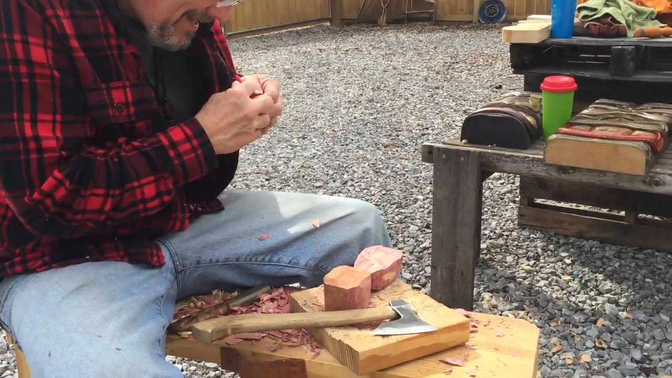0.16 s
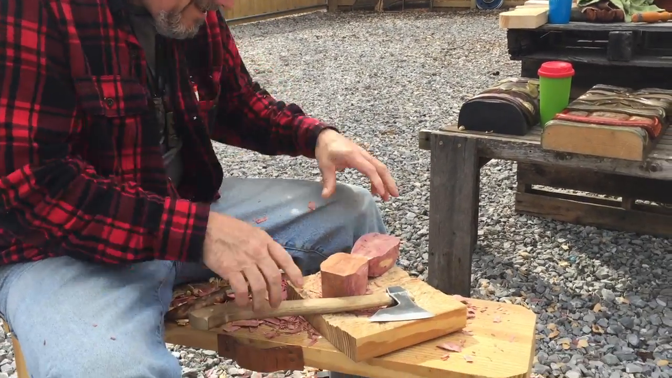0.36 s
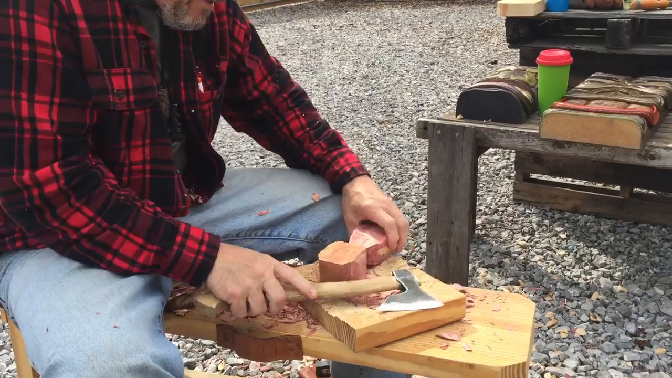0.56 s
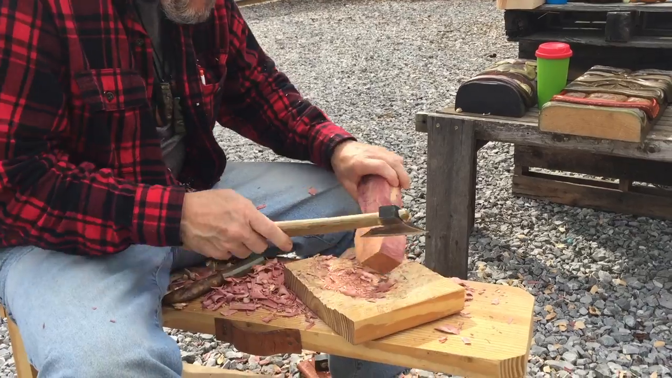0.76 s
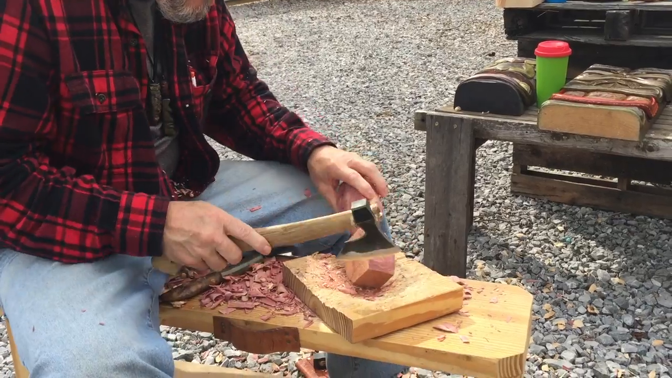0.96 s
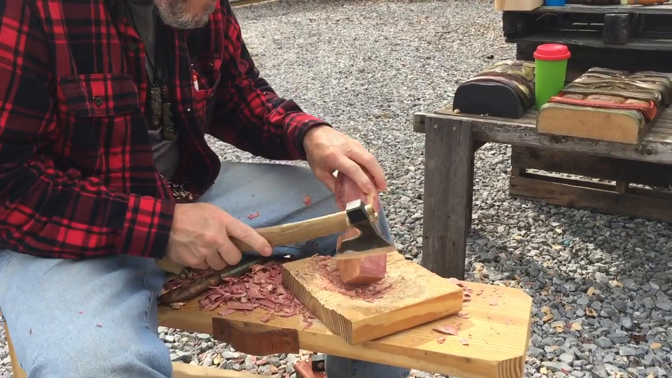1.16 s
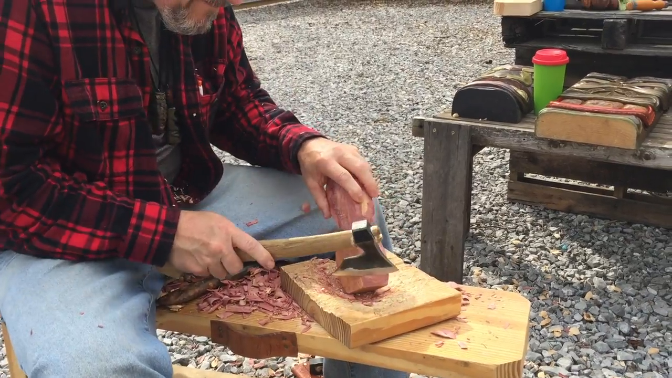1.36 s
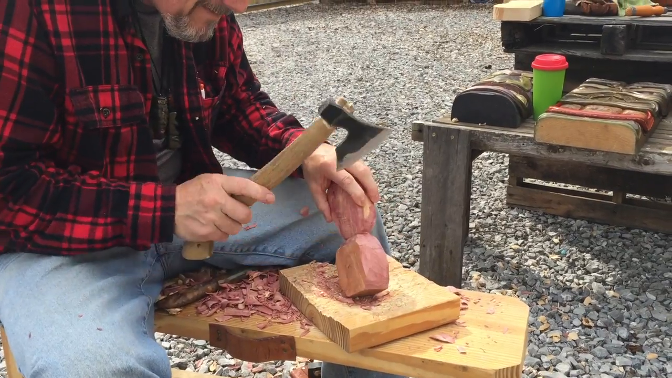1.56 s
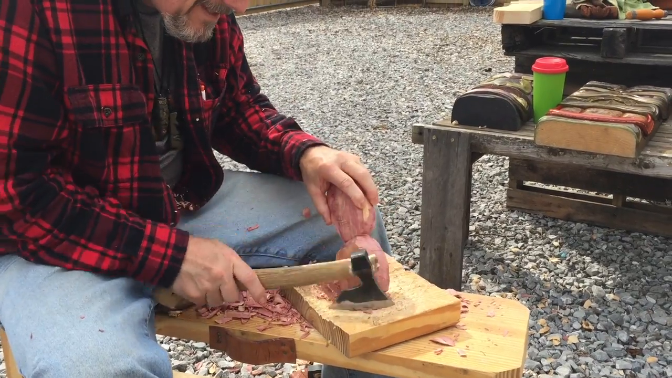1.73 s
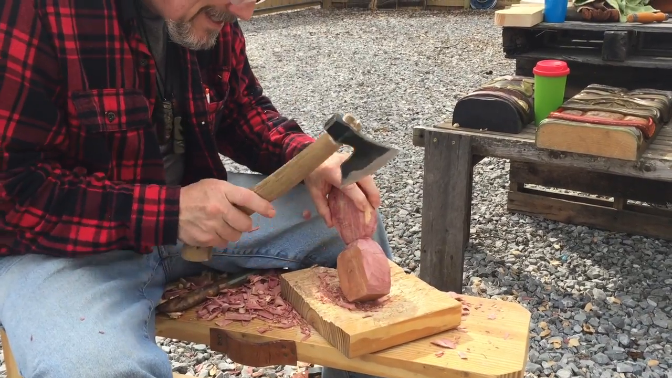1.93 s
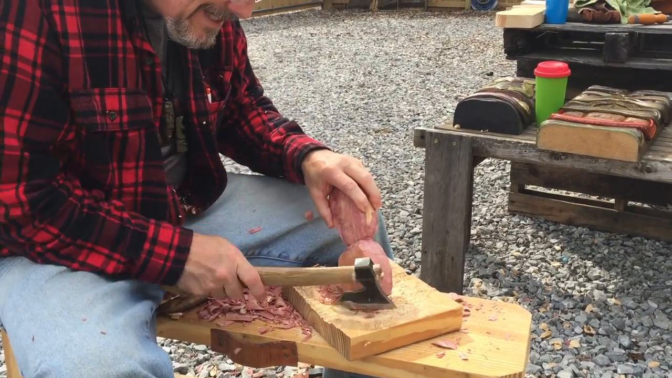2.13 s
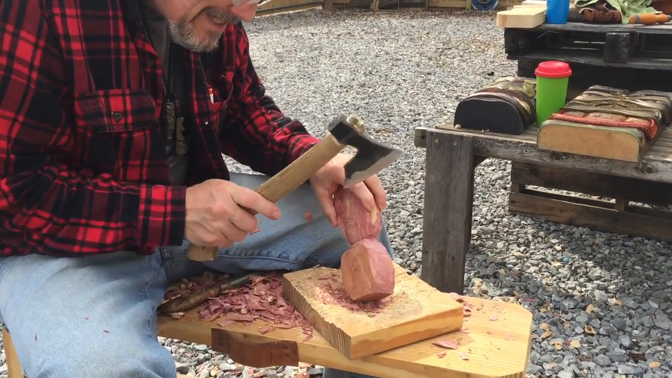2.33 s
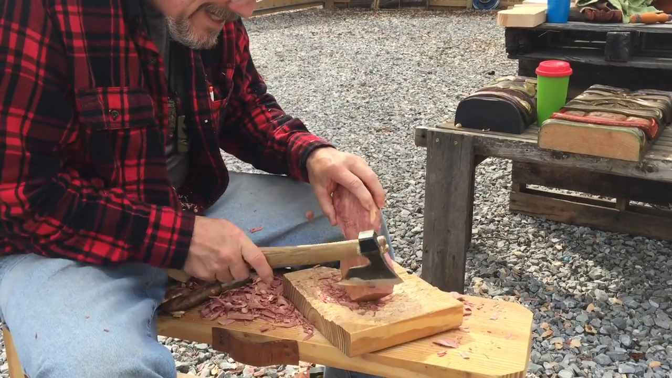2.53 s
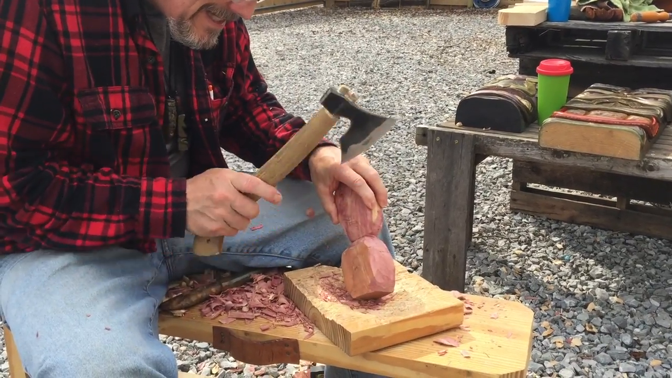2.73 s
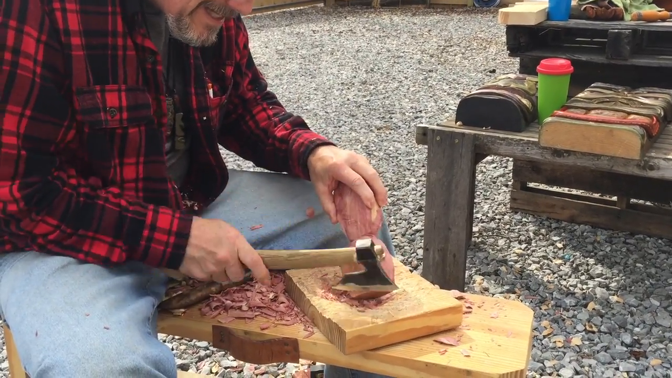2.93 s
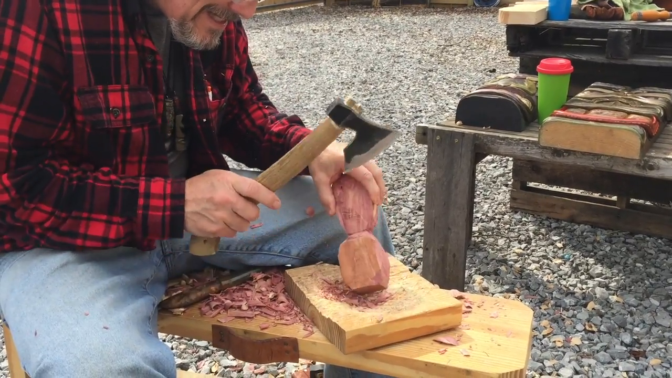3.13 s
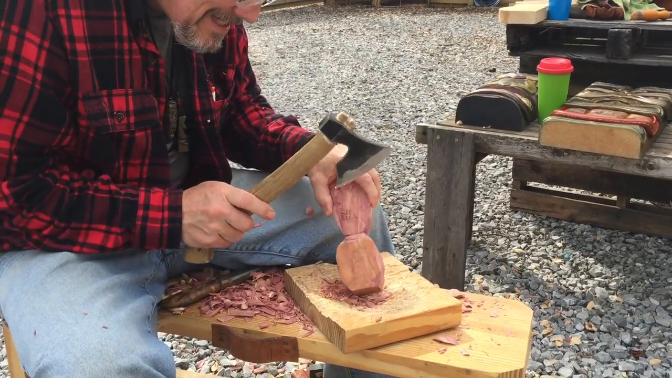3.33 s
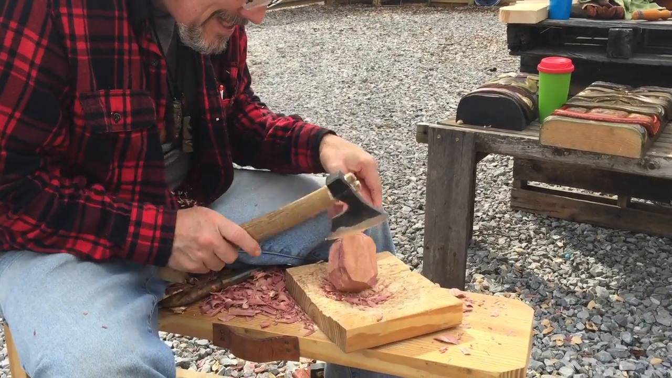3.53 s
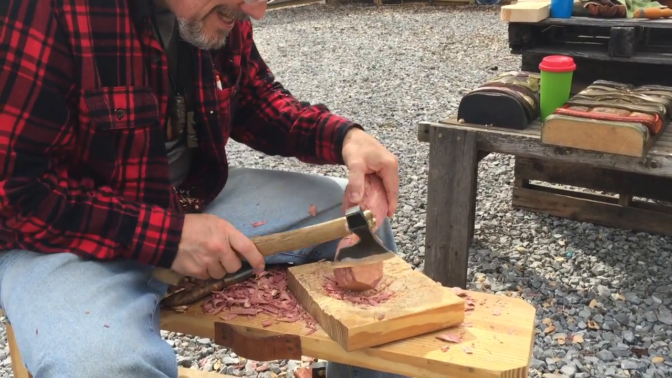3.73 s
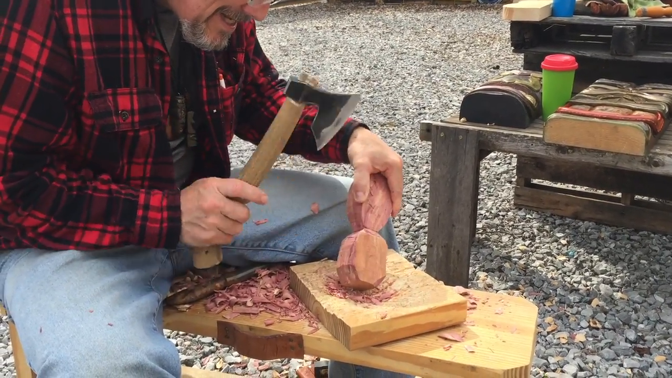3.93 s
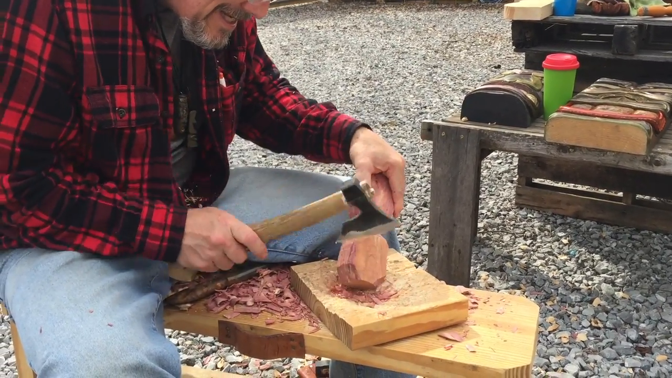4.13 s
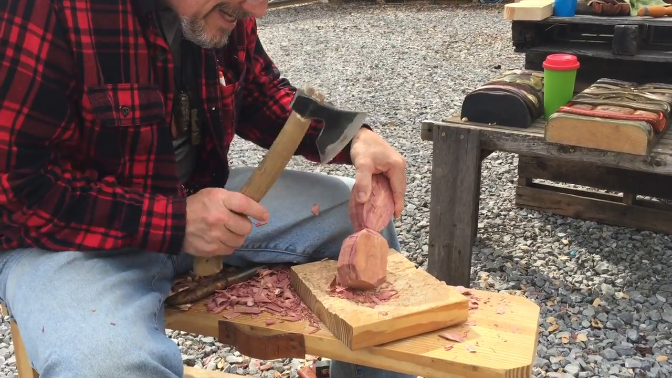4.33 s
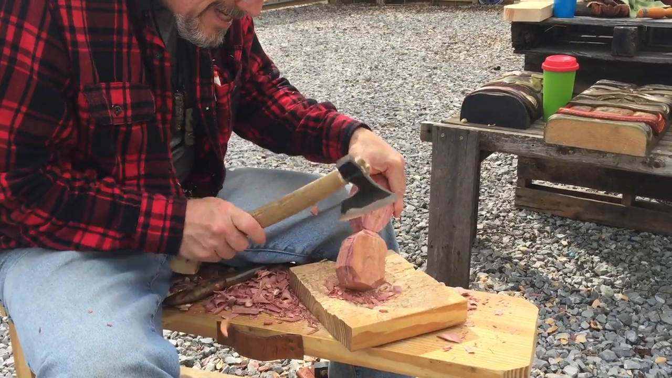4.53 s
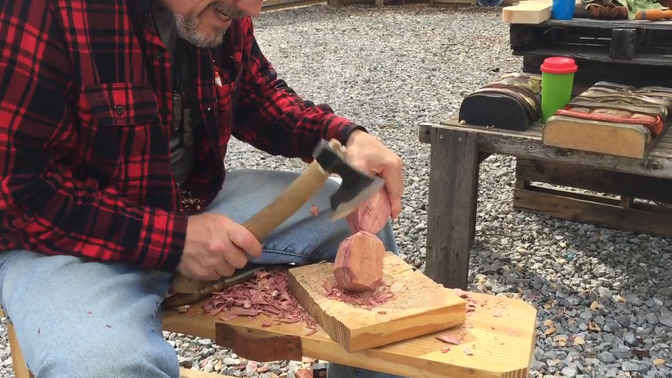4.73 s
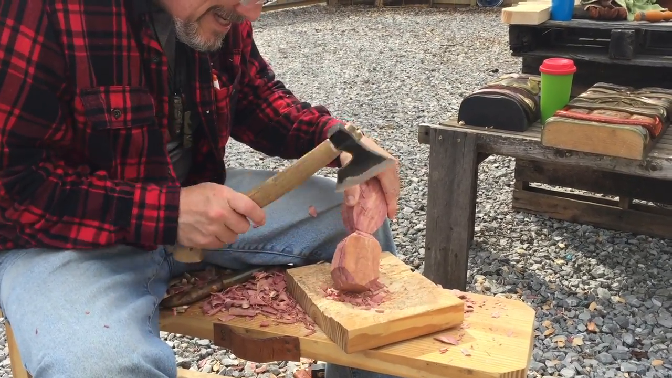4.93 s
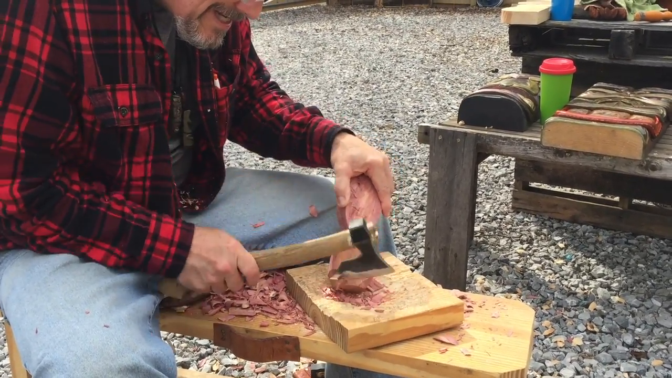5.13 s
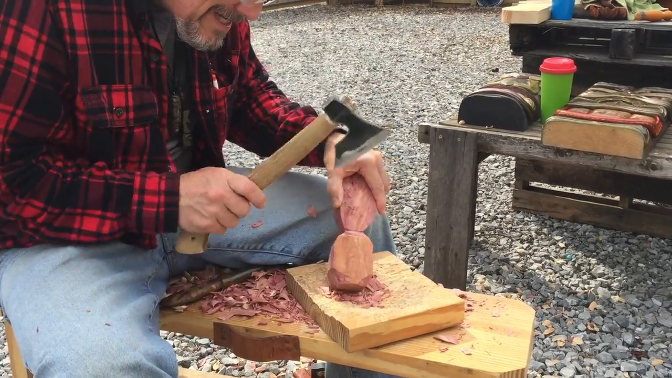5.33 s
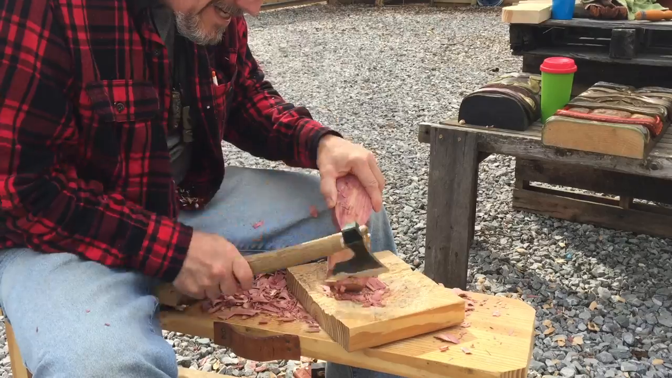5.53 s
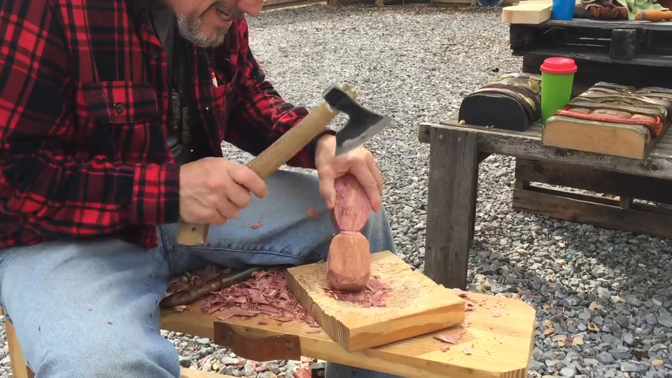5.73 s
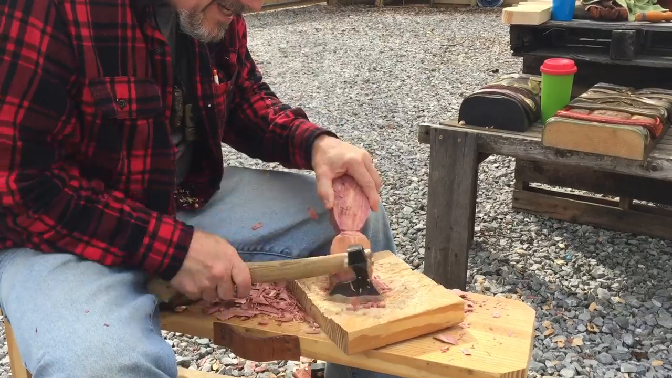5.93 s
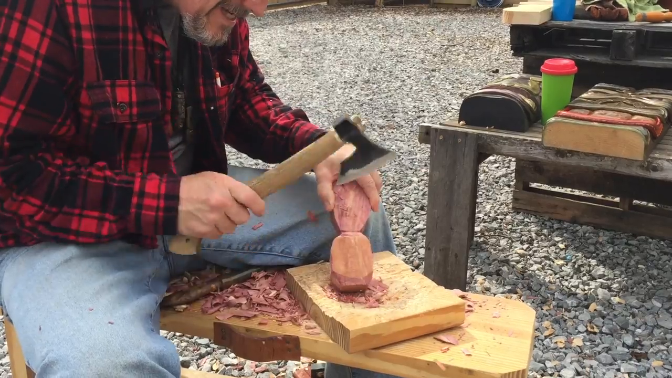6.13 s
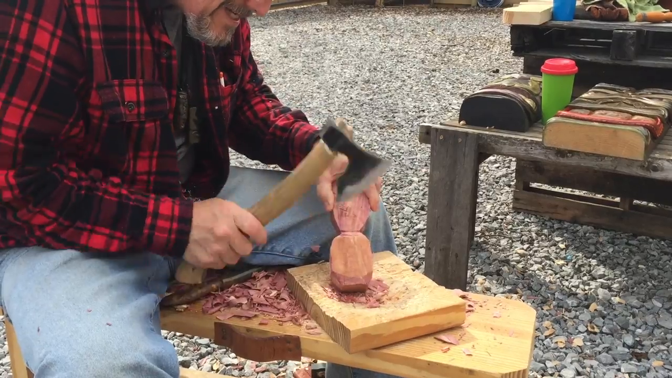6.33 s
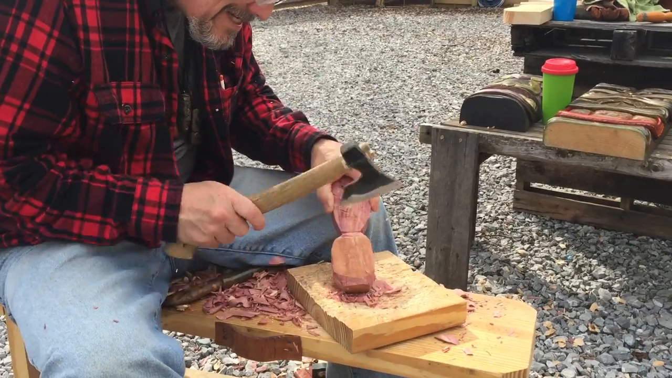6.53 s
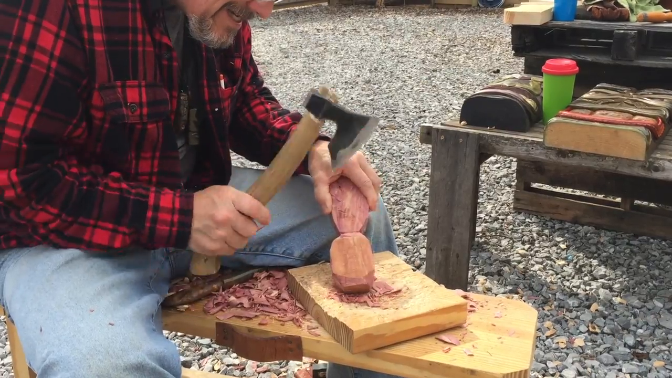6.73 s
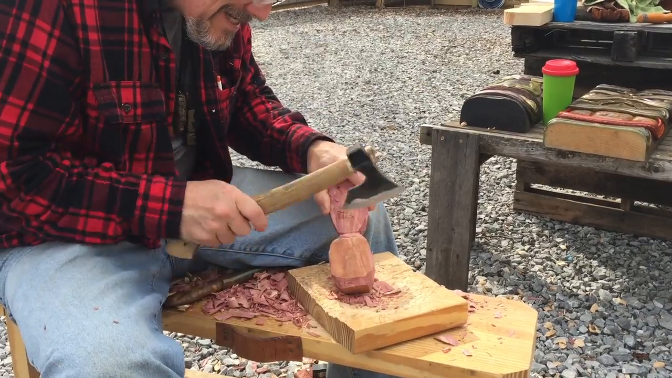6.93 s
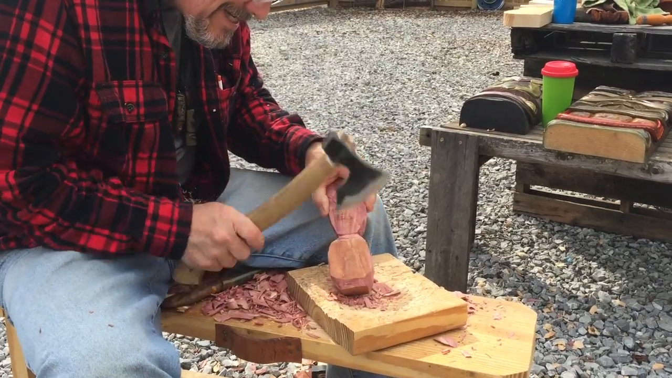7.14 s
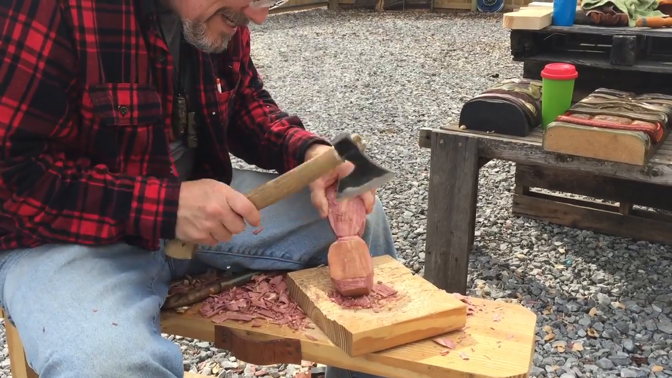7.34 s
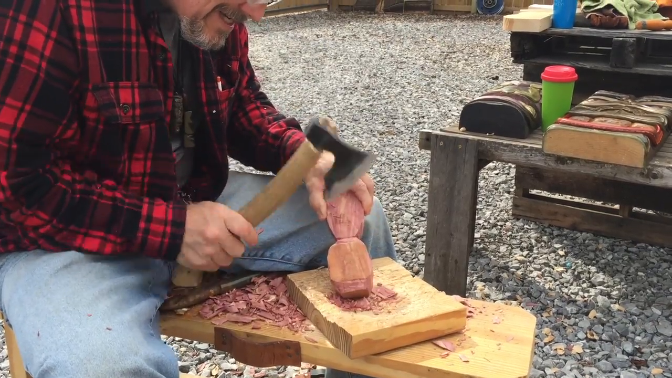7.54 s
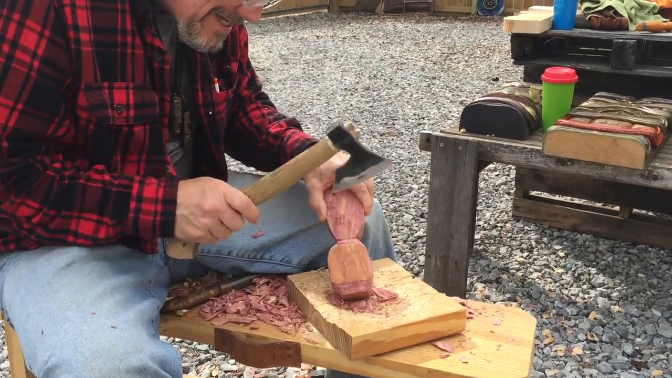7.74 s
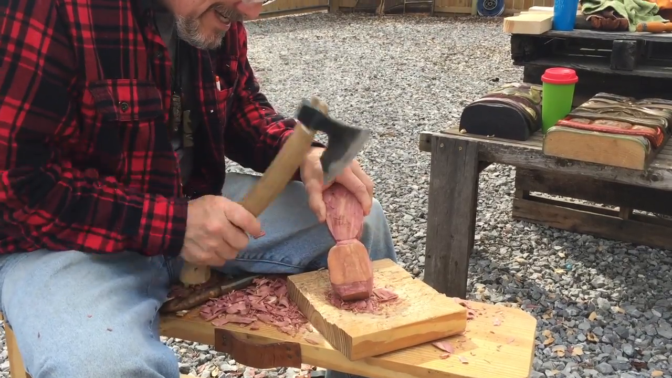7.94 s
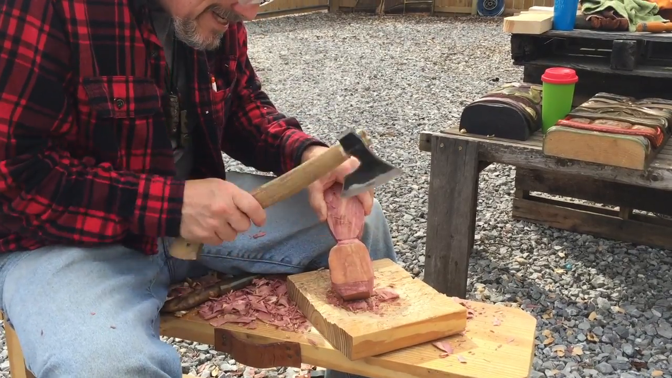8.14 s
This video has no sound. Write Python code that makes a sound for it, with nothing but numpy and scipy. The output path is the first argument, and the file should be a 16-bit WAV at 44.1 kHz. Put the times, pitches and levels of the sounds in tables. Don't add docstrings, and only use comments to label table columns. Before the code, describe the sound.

From 0 to 1.8 s it is quiet outdoors: low lumpy traffic rumble, faint hiss, thin far bird peeps, small ticks, a sleeve rustle and a wooden blank dragged softly, with light hatchet contacts at about 0.95 and 1.35 s. Four chops follow at 1.85, 2.2, 2.6 and 3.0 s, each a crackle of splitting fibre, a hard wooden knock and a low bench thump, with short steel ringing and diffuse fence echoes. A pause holds soft rubs, ticks and a gentle tap at 3.77 s. From 4.15 s chopping resumes evenly, roughly every 0.4 s, to 8.1 s. From 5.67 s the blows grow much heavier; the last two, at 7.7 and 8.1 s, are the strongest and overload the close microphone. Chips tick between strokes, and a clearer bird whistle comes near 7.5 s. Echoes fade at the end, around 8.3 s.

```python
import sys
import numpy as np
from scipy import signal
from scipy.fft import rfft, irfft, next_fast_len
from scipy.io import wavfile
from scipy.ndimage import uniform_filter1d, map_coordinates

SR = 44100
rng = np.random.default_rng(int(sys.argv[2]) if len(sys.argv) > 2 else 0)


def ratio(d):
    e = np.asarray(d, float) / 20
    return 10 ** e


def inscribe(sig):
    pcm = np.round(np.clip(np.atleast_2d(sig).T, -1, 1) * 32767)
    wavfile.write(sys.argv[1], SR, pcm.astype(np.int16))


N = 365148
SPAN = SR * 3 // 4

# start in seconds, splitting level in dB, knock level in dB,
# knock pitch in Hz, treble tilt (well above 7 kHz the level changes by about twice this many dB per octave).
BITES = [(1.845, -23.5, -20.5, 790, 1.7), (2.2106, -8.5, -14, 945.5, -1), (2.588, -12.5, -21, 944, 2.9),
         (2.9827, -9.5, -14.5, 1378, -0.46), (4.155, -22, -19, 952, 2.5), (4.525, -10, -17.5, 1380, 3.5),
         (4.8932, -15.5, -13, 1300, 3), (5.2732, -10, -23.5, 1195, 1), (5.667, -8.5, -4.5, 1200, 1.5),
         (6.0684, -9.5, -6.5, 1000, -0.5), (6.5, -18.5, -14.5, 1700, 0.5),
         (6.9144, -11.5, -6.5, 1615, -0.8), (7.2986, -14.5, -6.5, 1700, 1), (7.7034, -5, -5.5, 1201, -3),
         (8.109, -4, -4, 1230, -3)]
# seconds until the fibres give way, seconds they tear,
# seconds to die away by 60 dB.
CUTS = [(0.00048, .003, 0.028), (.0005, .003, 0.027), (.0014, 0.0017, 0.02), (.0002, .002, 0.02),
        (0.0011, .004, .03), (.002, .003, .018), (.0028, .003, 0.029), (.0002, .0015, .018),
        (.0001, .0015, .016), (.0004, .0015, 0.018), (.0008, .003, .03), (0.000084, .002, .018),
        (.0001, .0015, .018), (.0001, 0.0012, .016), (.0003, .0015, 0.0162)]
# start in seconds, click level in dB, low knock
# level in dB.
LEAD_INS = [(1.822, -68, -61), (2.187, -70, -48.5), (2.565, -58, -57.5), (2.96, -55.5, -46.5),
            (4.139, -65.5, -67.5), (4.505, -43.5, -53), (4.868, -44.5, -54), (5.2559, -30.5, -63),
            (5.6421, -38.5, -46.5), (6.046, -54, -46.5), (6.481, -39, -41), (6.892, -48.5, -45.5),
            (7.2775, -49.5, -40), (7.68, -47, -40.5), (8.087, -49.5, -44)]
# pitch in Hz, width in Hz, level in dB.
BOARD = [(634, 280, 0), (790, 250, 1.5), (1165, 200, -2), (1700, 280, -4.5), (2226, 320, -7.5),
         (2814, 190, -11), (3414, 250, -12.5)]
# delay in seconds, level in dB, spread in seconds.
FENCES = [
    (0.01, 13.5, .01),
    (.035, 5.5, 0.0081),
    (0.066, 9, .006),
    (.075, -1.5, .012),
    (0.126, -2.5, 0.018),
]


def unit(x):
    return x / np.sqrt(np.mean(x ** 2) + 1e-20)


def along(points, hz):
    f, v = np.transpose(points)
    return np.interp(np.log(hz + 1), np.log(f + 1), v)


def curves(rows, left=None, right=None):
    s, *columns = np.transpose(rows)
    return [np.interp(np.arange(N) / SR, s, column, left, right) for column in columns]


def wobble(rate):
    knots = rng.standard_normal(int(N * rate / SR) + 4)
    return map_coordinates(knots, [np.arange(N) * rate / SR])


def filtered(x, response):
    m = next_fast_len(len(x) + SR // 8)
    return irfft(rfft(x, m) * response(np.fft.rfftfreq(m, 1 / SR)), m)[:len(x)]


def body(modes):
    def response(f):
        total = 0
        for k, (hz, width, db) in enumerate(modes):
            total = total + (-1) ** k * ratio(db) * 1j * f * width / (hz * hz - f * f + 1j * f * width)
        return total
    return response


def tilted(x, tilt_db):
    return filtered(x, lambda f: (1 + 1j * f / 7000) ** (tilt_db / 3))


def add(track, s, sound):
    track[round(s * SR):][:len(sound)] += sound


def burst(t, rise, hold, t60, grain_db):
    grains = ratio(grain_db * rng.standard_normal(len(t)))
    fade = ratio(-60 * np.maximum(t - hold, 0) / t60)
    return (1 - np.exp(-t / rise)) * fade * grains * rng.standard_normal(len(t))


def ringing(modes, t, scatter_db):
    total = np.zeros(len(t))
    for hz, db, t60 in modes:
        level = ratio(db + rng.normal(0, scatter_db) - 60 * t / t60)
        total += level * np.sin(2 * np.pi * (hz * t + rng.random()))
    return total


def hatchet():
    # pitch in Hz, width in Hz, level in dB.
    fibre = [(2967, 260, -3.5), (3855, 540, 5), (4910, 1300, -0.5), (5930, 600, 1), (6720, 340, -3.5),
             (8150, 1700, -8), (10000, 1300, -10), (13000, 2200, -8.5)]
    # start in seconds, splitting level in dB, knock level in dB, knock pitch in Hz.
    landings = [(.954, -68, -35, 1000), (1.355, -54, -51, 700), (1.857, -22.5, -8.5, 1360),
                (1.8628, -33.5, -12.5, 1610), (2.226, -28.5, -16.5, 986), (2.5951, -26.5, -22, 2200),
                (2.99, -26.5, -8, 1152), (3.769, -42.5, -41, 517), (4.166, -23.5, -8, 1282),
                (4.176, -47.5, -25, 900), (4.528, -18.5, -21.5, 1987), (4.908, -31.5, -11.5, 790),
                (4.925, -47.5, -29.5, 803), (5.276, -19.5, -15, 420.5), (5.676, -38.5, -18, 1200),
                (6.077, -31.5, -10, 1087), (6.086, -36.5, -28, 900), (6.507, -11.5, -2.5, 1275),
                (6.514, -33.5, -15.5, 1277)]
    out, t = np.zeros(N + SPAN), np.arange(SR // 5) / SR
    first = slice(0, 200)
    contacts = BITES + [(*landing, 0) for landing in landings]
    cuts = CUTS + [(0.00025, 0.0014, .018)] * len(landings)
    for (s, split_db, knock_db, knock_hz, tilt_db), (lag, hold, t60) in zip(contacts, cuts):
        split = filtered(burst(t, rise=0.0003, hold=hold, t60=t60, grain_db=6.5), body(fibre))
        split = tilted(split / np.std(split[first]), tilt_db)
        split = np.roll(split, round(lag * SR))
        board = filtered(burst(t, rise=0.0003, hold=0.003, t60=0.023, grain_db=0.0), body(BOARD))
        bent_t = t + 0.0002 * (1 - np.exp(-t / 0.0035))
        swell = (1 - np.exp(-t / 0.00024)) * ratio(-60 * (t / 0.01) ** 2)
        blank = ratio(knock_db - 3.0) * swell * np.sin(2 * np.pi * knock_hz * bent_t)
        far = ratio(split_db - 5.5) * split + ratio(knock_db - 7.0) * board / np.std(board[first])
        add(out, s, far + blank)
        add(out, s, ratio(-24.5) * yard(far + 0.64 * blank))
    return out[:N]


def bench():
    # pitch in Hz, level in dB, seconds to die away by 60 dB.
    bench_tones = [(45, -24, .08), (105, -17.5, .06), (150, -11, .1), (205, -12, .09), (300, -22, .06),
                   (420, -22, .05)]
    # crest in seconds, level in dB, pitch in Hz.
    thumps = [(.961, -23, 244), (1.3625, -34, 229), (1.851, -21, 263), (1.863, -10.5, 267),
              (2.2195, -18, 200), (2.232, -12, 271), (2.5995, -15, 270), (2.989, -8, 271),
              (2.998, -13, 276), (3.773, -41, 226), (4.1725, -8, 269), (4.185, -21, 300),
              (4.5355, -16, 275), (4.902, -13, 260), (4.9135, -9, 269), (4.93, -23, 265), (5.282, -10, 200),
              (5.674, -4, 253), (6.075, -5, 280), (6.082, -7, 235), (6.513, -4, 259), (6.921, -6, 253),
              (7.305, -3, 256), (7.71, -2, 257), (8.116, -2.5, 249)]
    lag_s, echo_db = 0.0059, -22
    out, t = np.zeros(N + SPAN), np.arange(SR // 5) / SR
    late = t - lag_s
    for s, db, hz in thumps:
        width = np.where(late < 0, .7, .75)
        swing = np.cos(2 * np.pi * hz * late) * np.exp(-(late * hz / width) ** 2)
        hum = ringing(bench_tones, t, scatter_db=5.0) * (1 - np.exp(-(t / 0.0018) ** 2))
        thump = ratio(db - 2.0) * (swing + ratio(-8.0) * hum)
        add(out, s - lag_s, thump)
        add(out, s - lag_s, ratio(echo_db) * yard(thump, FENCES[1:]))
    return out[:N]


def singing():
    # level in dB, three pitches in Hz.
    songs = [(-24, 3200, 5400, 12900), (-26, 3800, 4200, 9300), (-15.5, 4200, 5500, 12300),
             (-19, 3450, 3900, 6600), (-23, 3400, 8200, 13500), (-17, 3620, 4800, 5750),
             (-16.5, 3900, 4700, 8000), (-16.5, 4100, 7100, 11700), (-19, 4800, 5600, 10800),
             (-21.5, 3600, 6300, 11000), (-25.5, 3500, 6400, 13650), (-15, 2500, 5855, 10200),
             (-17.5, 1900, 9800, 14000), (-19, 4800, 6320, 9500), (-36, 5100, 6900, 13200)]
    # start in seconds, level in dB, two pitches in Hz.
    resting = [
        (1.355, -49.5, 3540, 2050),
        (3.769, -37.5, 2073, 3554),
    ]
    out, t = np.zeros(N + SPAN), np.arange(SR // 5) / SR
    width = np.log(1000) / np.pi / .022
    strokes = [(bite[0] + cut[0], bite[4], *song) for bite, cut, song in zip(BITES, CUTS, songs)]
    for s, tilt_db, db, *pitches in strokes + [(s, 0, *song) for s, *song in resting]:
        feed = burst(t, rise=.0008, hold=0.00063, t60=0.00067, grain_db=-1.5)
        rings = [filtered(feed, body([(hz, width * (hz / 3500) ** 0.71, 0)])) for hz in pitches]
        ring = tilted(ratio(db) * sum(r / np.abs(r).max() for r in rings), tilt_db)
        add(out, s, ring)
        dulled = filtered(ring, lambda f: 1 / (1 + 1j * f / 6000) ** 2)
        add(out, s, ratio(-19.5) * yard(dulled))
    return out[:N]


def head():
    # start in seconds, pitch in Hz, level in dB,
    # seconds to die away by 60 dB.
    steel = [
        (2.212, 3470, -20, .035),
        (2.215, 8320, -36, .05),
        (2.985, 8360, -36.5, .07),
        (4.158, 8100, -39.5, .06),
        (4.899, 3445, -29, .075),
        (4.9, 8280, -25.5, 0.046),
        (6.072, 3440, -27.5, .11),
        (6.508, 3450, -33, .09),
        (6.917, 9960, -44.5, 0.087),
        (7.301, 3440, -35.5, 0.073),
    ]
    # start in seconds, pitch in Hz, level in dB, seconds to die away by 60 dB.
    wood = [(1.857, 3700, -16.5, .02), (4.166, 611, -21.5, .04), (4.525, 990, -20.5, 0.03),
            (4.908, 1186, -16, .03), (5.274, 824, -20, 0.032), (5.274, 2800, -22, .025),
            (6.069, 790, -16, .04), (6.508, 773, -14.5, .04), (6.915, 1700, -9.5, .03),
            (6.917, 410, -19.5, .05), (7.299, 1231, -10, .03), (7.7045, 610, -10, .04),
            (8.11, 1230, -10.5, 0.029), (7.299, 1680, -10.5, 0.024), (5.667, 4020, -12, .02),
            (6.915, 3020, -16, 0.023), (.955, 1480, -36, 0.034), (1.355, 3600, -42, 0.043),
            (3.769, 2070, -36, 0.037), (3.769, 3540, -39.5, 0.041), (1.8575, 1560, -10.5, .03),
            (1.858, 2850, -19, .022), (2.992, 3400, -19, .025), (6.915, 4850, -17, .018),
            (3.043, 4400, -44, .035), (2.984, 1000, -16, .03), (6.508, 480, -19, .09)]
    out, t = np.zeros(N + SPAN), np.arange(SR // 4) / SR
    for s, hz, db, t60 in steel + wood:
        unsteady = ratio(2.5 * wobble(120)[:len(t)])
        onset = 1 - np.exp(-(t * hz / 1.1) ** 2)
        add(out, s, onset * unsteady * ringing([(hz, db, t60)], t, scatter_db=0))
    return out[:N]


def yard(x, fences=FENCES):
    # frequency in Hz, seconds to die away by 60 dB.
    lasting = [(150, 0.069), (500, .3), (1200, 0.53), (2500, .5), (5000, 0.27), (12000, 0.32)]
    # frequency in Hz, level in dB.
    colour = [(100, 0.5), (300, 6), (1200, -1.5), (2500, -3), (6000, -11), (15000, -8.5)]
    hz, t, z = signal.stft(rng.standard_normal(SPAN), SR, nperseg=128)
    echoes_db = sum(db * np.exp(-((t - s) / w) ** 2) for s, db, w in fences)
    z = z * ratio(echoes_db + along(colour, hz)[:, None] - 60 * t / along(lasting, hz)[:, None])
    tail = signal.istft(z, SR, nperseg=128)[1]
    return signal.fftconvolve(np.pad(x, (300, 0)), tail / np.linalg.norm(tail))[:SPAN]


def spray():
    # dull level in dB, bright level in dB.
    chips = [(-48.5, -61.5), (-53.5, -55), (-57, -53), (-47, -54), (-55, -58), (-57, -49.5), (-58, -53),
             (-52.5, -50), (-47.5, -53.5), (-55, -52), (-53, -60), (-48, -55.5), (-46, -56), (-50.5, -50.5),
             (-49, -50.5)]
    echo_hz = [(1120, 1640, 2840, 3600, 8270), (1120, 2550, 4310, 6460, 8350),
               (2300, 3050, 3900, 5450, 9650), (1210, 1720, 3400, 4750, 8350),
               (1120, 2150, 3000, 4500, 8100), (1950, 2420, 4600, 5700, 7750),
               (2670, 4650, 5250, 8270, 9040), (2840, 4300, 5770, 7000, 8610),
               (1210, 2500, 4800, 6200, 9390), (1120, 2240, 3450, 4600, 5900),
               (950, 1980, 3450, 4600, 8350), (1710, 2580, 4750, 6720, 9990),
               (1650, 2120, 3800, 6300, 9600), (1290, 2240, 2840, 6460, 7240),
               (1460, 2410, 2840, 6030, 6630)]
    echo_db = [(-86.5, -87, -88, -96, -110), (-91, -90, -89, -99, -98), (-82, -88, -90, -89, -101),
               (-86, -88, -89, -88, -96), (-86, -91, -97, -96, -99), (-84, -84, -89.5, -90, -92),
               (-94, -96, -94, -95, -103), (-87.5, -88.5, -93, -88, -96), (-79, -82, -94, -96, -101),
               (-85, -86.5, -89, -91, -91.5), (-81.5, -85, -89.5, -94, -105),
               (-79.5, -80, -93.5, -97.5, -92.5), (-81, -80, -92.5, -97.5, -99), (-80, -97, -90, -94, -98),
               (-82, -80, -91, -93, -97)]
    t60, after_s = 0.37, .014
    relative_width, lift_db = .12, 5
    dull_body = body([(445, 190, 7), (1200, 770, -4.0), (1920, 430, 3.5), (2500, 600, -3.5),
                      (3660, 960, -8.0)])
    bright_body = body([(5600, 3500, 3), (11500, 9000, -4.5)])
    out, t = np.zeros(N + SPAN), np.arange(SPAN) / SR
    echoes_db = sum(db * np.exp(-((t + 0.0071 - s) / w) ** 2) for s, db, w in FENCES)

    def fade(life):
        return (1 - np.exp(-t / 0.046)) * ratio(-60 * t / life)

    for (s, *_), (dull_db, bright_db), pitches, levels in zip(BITES, chips, echo_hz, echo_db):
        lumps_db = 4.5 * np.interp(t, np.arange(400) / 450, rng.standard_normal(400))
        clumps = ratio(echoes_db + lumps_db)
        ragged = rng.standard_normal(500) * np.hanning(500)
        noise = rng.standard_normal((2, SPAN))
        grains = clumps * signal.fftconvolve(noise, ragged[None], "same", axes=1)
        dull = unit(filtered(grains[0], dull_body))
        bright = unit(filtered(grains[1], lambda f: bright_body(f) ** 2))
        sound = ratio(dull_db) * fade(1.6 * t60) * dull + ratio(bright_db) * fade(t60) * bright
        for hz, db in zip(pitches, levels):
            width = relative_width * hz
            band = unit(filtered(rng.standard_normal(SPAN), lambda f: body([(hz, width, 0)])(f) ** 2))
            patches_db = 3 * np.interp(t, np.arange(40) / 45, rng.standard_normal(40))
            band = band * ratio(echoes_db + patches_db) * np.sqrt(ratio(lumps_db))
            life = t60 * (7000 / hz) ** 0.2
            sound = sound + ratio(db + lift_db) * np.sqrt(width) * fade(life) * band
        add(out, s + after_s, sound)
    return out[:N]


def ticks():
    # start in seconds, peak level in dB, pitch in Hz.
    dry_chips = [(.214, -48, 5400), (.5925, -49.5, 7660), (1.354, -48, 3570), (3.4067, -37.5, 9500),
                 (3.535, -49.5, 2990), (3.597, -51, 8840), (3.607, -54, 2920), (3.963, -48, 4900),
                 (5.0965, -45, 13200), (5.189, -50, 4780), (5.5185, -41, 5530), (6.007, -37.5, 4550),
                 (6.393, -46, 13440), (6.46, -45.5, 14860),
                 (.5133, -63, 5000), (.6974, -58, 7500), (.9857, -56, 7900), (1.079, -61, 7900),
                (1.3364, -56, 8300), (1.835, -45, 4000), (1.98, -60, 8000), (2.035, -60, 7280),
                (2.74, -58, 7800), (2.92, -57, 9210), (3.022, -40, 4650), (3.14, -58, 6000),
                (3.2074, -57, 3730), (3.2379, -55, 12500), (3.27, -58, 13000), (3.4918, -57.5, 5500),
                (4.572, -50, 10000), (4.683, -60, 10500), (5.105, -55, 9470), (5.24, -45, 3200),
                (5.533, -48, 8500), (5.622, -53.5, 9000), (5.772, -54, 6500), (6.1278, -42, 12450),
                (6.185, -54, 7000), (6.4, -46.5, 12500), (6.407, -51, 8500), (6.62, -58, 9000),
                (7.3585, -44, 6200), (7.445, -57, 12000), (7.81, -51, 5700)]
    # start in seconds, peak level in dB, pitch in Hz, low knock level
    # in dB.
    knocking = [(.774, -48, 6900, -50), (1.029, -53, 4350, -53), (2.3375, -49, 6400, -53),
                (2.3685, -47, 4190, -56), (3.769, -37, 3510, -43), (4.31, -59, 3090, -56),
                (4.4953, -51, 3780, -52.5), (4.516, -50, 3490, -50), (4.877, -52, 3203, -44.5),
                (5.2264, -31.5, 8860, -45), (5.3462, -30, 3770, -40.5), (5.655, -44, 2990, -34),
                (6.469, -34, 14100, -57), (6.565, -40, 3830, -48), (6.904, -53, 3080, -37),
                (6.979, -35, 5950, -59), (7.327, -35, 13000, -54), (7.869, -52.5, 6400, -67)]
    out, t = np.zeros(N + SPAN), np.arange(SR // 12) / SR
    light = [(s, db, hz, db - 22) for s, db, hz in dry_chips]
    leading = [(s, db, 3500, low_db) for s, db, low_db in LEAD_INS]
    for s, db, hz, low_db in light + knocking + leading:
        t60 = 0.0093 * (4000 / hz) ** .3
        shake = burst(t, rise=.0004, hold=.001, t60=np.clip(t60, .003, .1), grain_db=6)
        click = filtered(shake, body([(hz, 700, 3)]))
        click = click + filtered(shake, lambda f: body([(hz, 7500, -6)])(f) ** 2)
        knock = burst(t, rise=0.00037, hold=0.0013, t60=0.025, grain_db=1.6)
        knock = filtered(knock, body([(335, 400, 6.9)] + BOARD))
        add(out, s, ratio(db) * click / np.abs(click).max())
        add(out, s, ratio(low_db + 1.5) * knock / np.abs(knock).max())
    return out[:N]


def rubs():
    # middle in seconds, level in dB, pitch in Hz, length in seconds.
    soft = [(0.675, -64, 1010, 0.022), (0.758, -52, 287, .02), (0.784, -63.5, 980, 0.033),
            (0.961, -44, 503, 0.023), (1.36, -50, 550, 0.017), (1.601, -60, 3120, 0.021),
            (3.24, -53.5, 256, 0.02), (3.291, -52, 249, 0.048), (3.531, -54.5, 257.4, 0.048),
            (3.555, -54.5, 2500, 0.036), (3.735, -60.5, 2640, 0.026), (3.766, -60, 2150, 0.02),
            (4.478, -70, 2800, 0.05), (5.483, -62.5, 1700, .013), (5.971, -54.5, 2600, 0.028),
            (5.972, -71, 6600, .02), (2.478, -66, 1200, .1), (7.268, -60, 3400, .019)]
    # middle in seconds, level in dB, centre in Hz, length in seconds.
    dry_scrapes = [(.625, -73, 3700, .03), (.715, -73, 7000, .03), (.785, -67.5, 7000, .03),
                   (.965, -63, 7500, .025), (1.05, -71, 5500, .03), (1.18, -72, 10000, .04),
                   (1.343, -68, 10000, .035), (1.362, -64, 11000, .015), (3.2, -69.5, 5980, 0.043),
                   (3.41, -56, 11000, .012), (3.455, -68, 13000, .025), (3.535, -67, 10000, .018),
                   (3.597, -64, 9520, .025), (3.968, -65, 5990, .015), (6.478, -54, 12000, .014),
                   (7.334, -51, 7000, .014)]
    out, t = np.zeros(N + SPAN), np.arange(SR // 8) / SR
    middle = .0625
    for (s, db, hz, length), wide in [(row, .4) for row in soft] + [(row, 1.1) for row in dry_scrapes]:
        rough = ratio(3 * wobble(350)[:len(t)]) * rng.standard_normal(len(t))
        rub = unit(filtered(rough, lambda f: body([(hz, wide * hz, 0)])(f) ** 2))
        add(out, s - middle, ratio(db) * rub * np.exp(-(2 * (t - middle) / length) ** 2))
    return out[:N]


def lead_rushes():
    ahead_s, length = .0085, .011
    out, t = np.zeros(N + SPAN), np.arange(SR // 8) / SR
    middle = .0625
    for (s, *_), (_, _, low_db) in zip(BITES, LEAD_INS):
        lead_rush = unit(filtered(rng.standard_normal(len(t)), body(BOARD + [(3100, 900, 3)])))
        level = ratio(np.clip(low_db - 11, -62, -50))
        add(out, s - ahead_s - middle, level * lead_rush * np.exp(-(2 * (t - middle) / length) ** 2))
    return out[:N]


def held(rows):
    rise, fall = 172, 299.5
    t, gain = np.arange(N) / SR, np.zeros(N)
    for s, hold, db in rows:
        gain += ratio(db - rise * np.maximum(s - t, 0) - fall * np.maximum(t - s - hold, 0))
    return gain


def slide():
    # start in seconds, hold in seconds, level in dB.
    drags = [
        (.66, 0.011, -68.5),
        (.97, 0.03, -66),
        (1.12, 0.24, -66),
    ]
    modes = body([(1270, 140, 1.5), (1760, 320, 3.5), (3700, 920, -1.0)])
    friction = ratio(1.8 * wobble(57.5)) * rng.standard_normal(N)
    return held(drags) * unit(filtered(friction, lambda f: modes(f) ** 2))


def rustle():
    # start in seconds, hold in seconds, level in dB.
    moves = [
        (.62, 0.18, -77.5),
        (.9, 0.47, -77),
        (3.12, .4, -76.5),
        (3.59, 0.013, -70),
        (5.42, 0.13, -76.5),
    ]
    crackle = ratio(3 * wobble(300) + 1.5 * wobble(20)) * rng.standard_normal(N)
    return held(moves) * unit(filtered(crackle, lambda f: body([(5500, 8000, 0)])(f) ** 2))


def bird():
    # start in seconds, length in seconds, pitch in Hz, level in dB.
    level_peeps = [(.07, .09, 4400, -79), (.38, .1, 3850, -81), (.51, .05, 5050, -84),
                   (.51, .03, 6550, -82), (.7, .03, 6250, -80), (.83, .12, 4180, -82),
                   (3.9, .07, 3780, -83), (2.91, .045, 4080, -76), (5.105, .14, 3853, -73.5),
                   (6.62, .13, 3780, -79), (7.978, .1, 4020, -76)]
    # time in seconds, pitch in Hz, level in dB.
    call = [
        (7.43, 3875, -75),
        (7.465, 3700, -58.5),
        (7.51, 3710, -56.5),
        (7.552, 3606, -52),
        (7.565, 3700, -67),
        (7.59, 3670, -81),
        (7.675, 3680, -80),
    ]
    out = np.zeros(N)
    whistles = [call]
    for s, length, hz, db in level_peeps:
        whistles.append([(s, hz, db - 7), (s + length / 2, hz, db), (s + length, hz, db - 7)])
    for whistle in whistles:
        hz = uniform_filter1d(curves(whistle)[0], 400) + 18 * wobble(45)
        db = curves(whistle, -120, -120)[1]
        gain = uniform_filter1d(ratio(db + 3.5), 240)
        out += gain * ratio(3.3 * wobble(60)) * np.sin(2 * np.pi * np.cumsum(hz) / SR)
    return out


def rush(spectrum, patchy_db):
    z = signal.stft(rng.standard_normal(N + 512), nperseg=512)[2]
    field = uniform_filter1d(uniform_filter1d(rng.standard_normal(z.shape), 6, 0), 14, 1)
    x = signal.istft(z * ratio(patchy_db * unit(field)), nperseg=512)[1][:N]
    return unit(filtered(x, lambda hz: ratio(along(spectrum, hz))))


def air():
    # time in seconds, rumble level in dB, hiss level in dB.
    levels = [
        (0.0, -48.5, -70),
        (5.0, -50.5, -72.5),
        (5.09, -48, -70.5),
        (8.09, -49.5, -69.5),
        (8.28, -49, -62.5),
    ]
    # frequency in Hz, level in dB per Hz.
    rumble_colour = [(14, -24), (81, -0.5), (147, -9.5), (248, -18), (271, -28.5), (400, -42.5),
                     (580, -66.5), (990, -120)]
    # frequency in Hz, level in dB per Hz.
    hiss_colour = [(180, -22.5), (300, -8.5), (907, -12.5), (1900, -17.5), (3900, -21.5), (4690, -26.5),
                   (12800, -33.5), (16500, -42)]
    rumble_db, hiss_db = curves(levels)
    rumble = ratio(rumble_db + 0.17 * wobble(8.0)) * rush(rumble_colour, patchy_db=2.5)
    return rumble + ratio(hiss_db) * rush(hiss_colour, patchy_db=0.2)


def scene():
    strokes = hatchet() + bench() + singing() + head() + spray()
    handling = ticks() + rubs() + lead_rushes() + slide() + rustle()
    return (strokes + handling + bird() + air())[None]


def low_pass(x):
    return signal.sosfilt(signal.butter(12, 17160, fs=SR, output="sos"), x)


def record(dry):
    # frequency in Hz, level in dB.
    tone = [(20, -6.5), (60, 2.5), (8000, -0.5), (13500, -1.5), (15800, 3.5), (16300, -10), (16950, -17.5),
            (17150, -88.5)]
    top, hard = .53, 5.5
    flat = dry[0] / (1 + np.abs(dry[0] / top) ** hard) ** (1 / hard)
    mix = filtered(flat, lambda hz: ratio(along(tone, hz)))
    return low_pass(mix[None])


dry = scene()
out = record(dry)
inscribe(out)
```